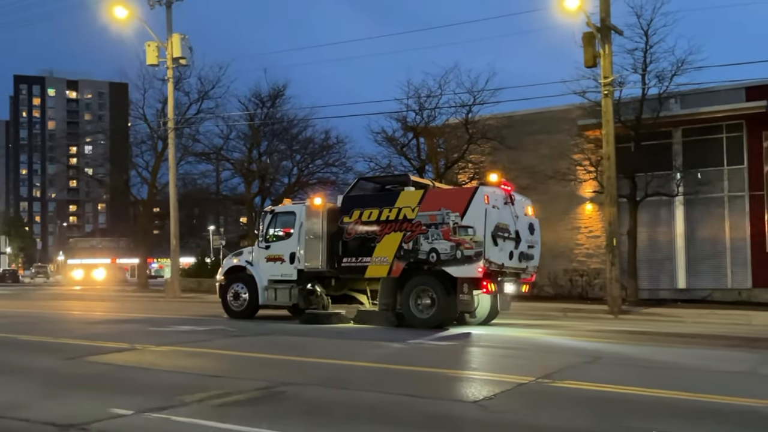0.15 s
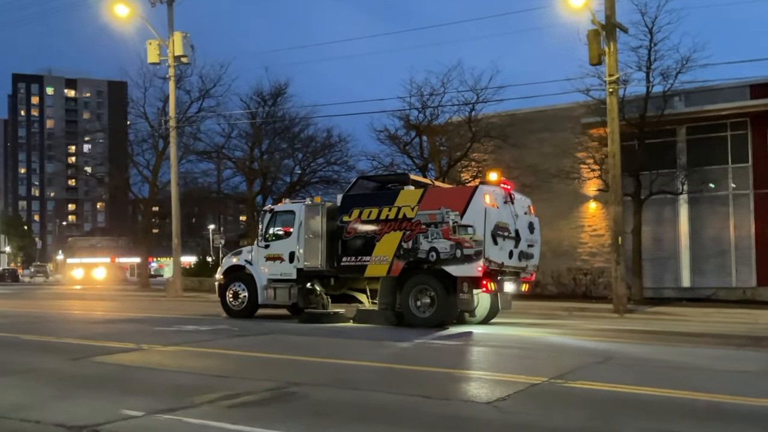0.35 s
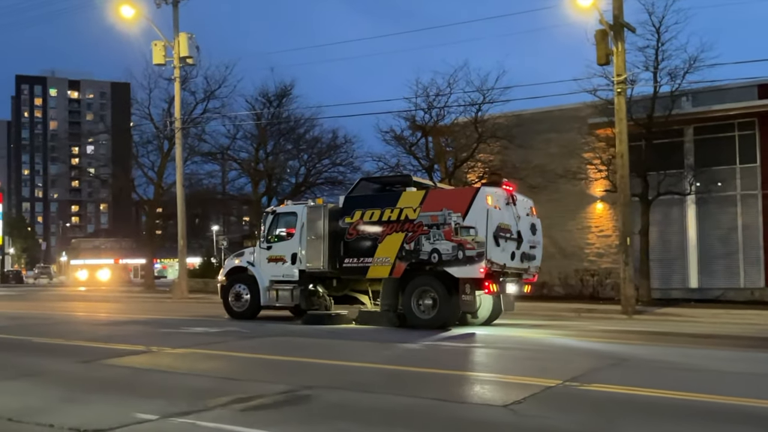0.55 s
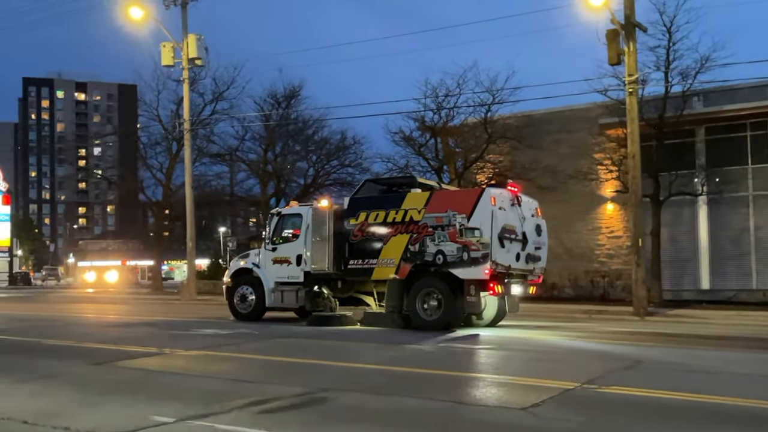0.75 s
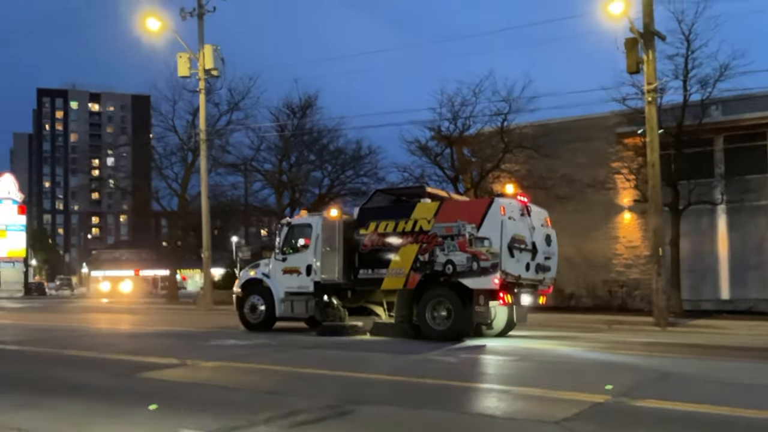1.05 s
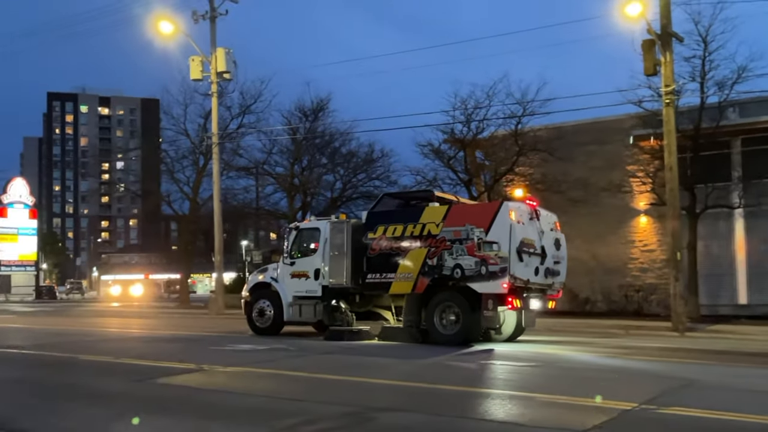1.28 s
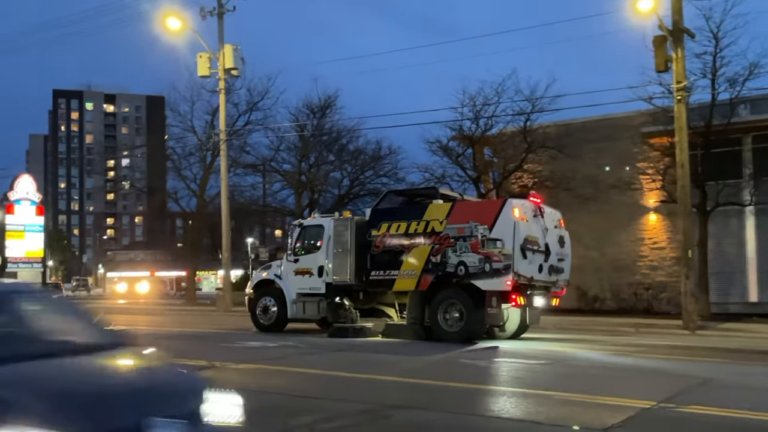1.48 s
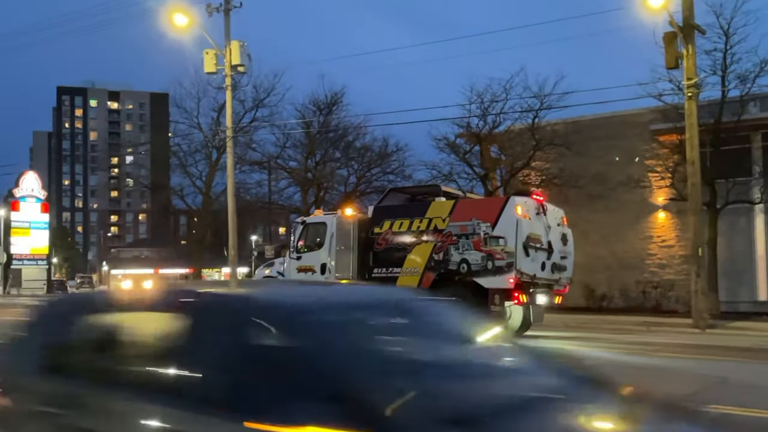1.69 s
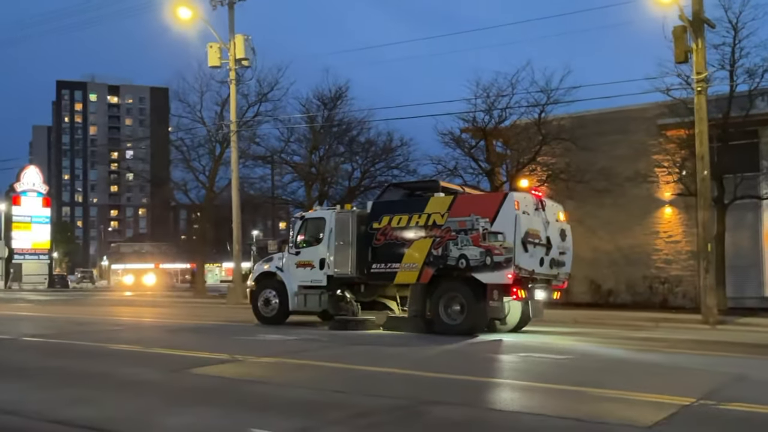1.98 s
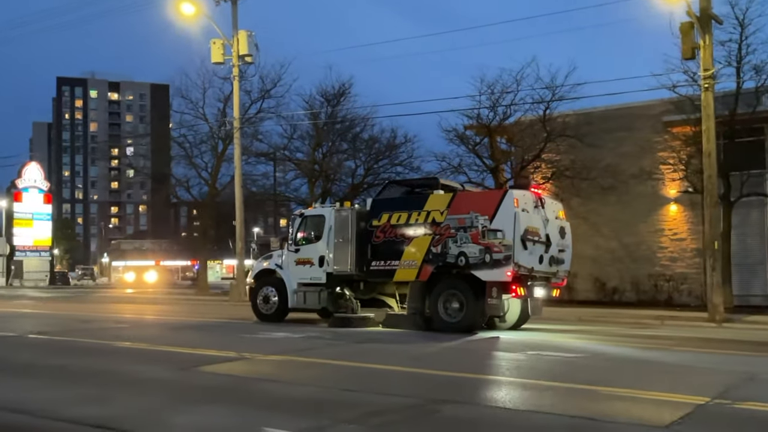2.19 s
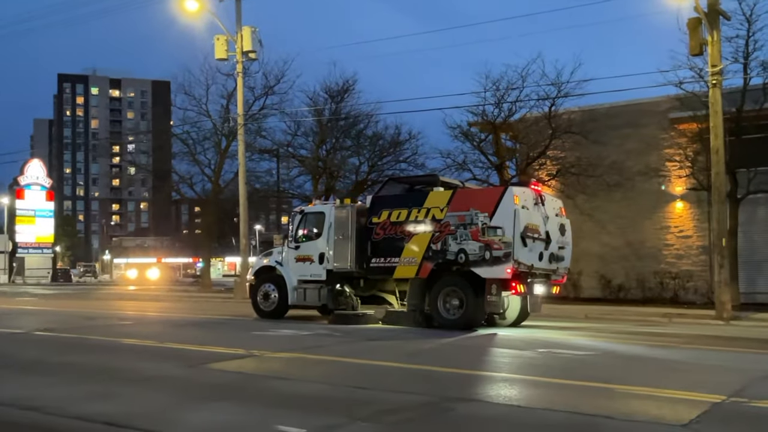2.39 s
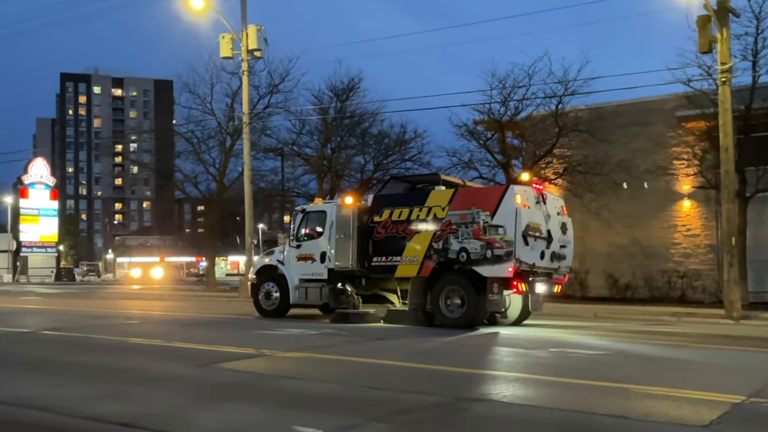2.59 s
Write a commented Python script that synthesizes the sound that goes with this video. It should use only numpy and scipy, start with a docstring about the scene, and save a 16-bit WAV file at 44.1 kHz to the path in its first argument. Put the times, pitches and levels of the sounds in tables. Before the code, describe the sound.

A street sweeper's roaring blower and hissing brooms across a city street, as a car whooshes past

```python
"""On a city street, a sweeper works along the far kerb: blower and engine roar, steel brooms hiss on asphalt.
Bristle flicks and shaped noise make the hiss; noise, resonances and a fan whine the blower; sines the engine.
A car passes close by from left to right as delayed tyre noise with an exhaust drone, slapping over two seams.
It briefly screens the brooms and blower, the finest hiss most.
Wind, as low noise in gusts, buffets the two microphone ports and drops about as the car comes abreast."""
import sys
import numpy as np
from scipy import signal
from scipy.fft import rfft, irfft
from scipy.io import wavfile
from scipy.ndimage import uniform_filter1d, map_coordinates

SR = 44100
rng = np.random.default_rng(int(sys.argv[2]) if len(sys.argv) > 2 else 0)


def transcribe(signal):
    """Save signal, clipped to [-1, 1], as a 16-bit WAV file at the path in sys.argv[1]."""
    frames = np.atleast_2d(signal).T
    limited = np.clip(frames, -1, 1)
    pcm = np.round(limited * 32767).astype(np.int16)
    wavfile.write(sys.argv[1], SR, pcm)


N = 120834
TIME = np.arange(N) / SR
HZ = np.maximum(np.arange(N // 2 + 1) * SR / N, 1)

# Swing of the brooms' hiss, before the low and high swing factors: time_s, swing_db
BROOM_SWING = [(0, 1.5), (.33, 3), (.64, 2.5), (.76, 1), (.98, 2), (1.22, 3), (1.38, 1), (1.6, 1.5),
               (1.92, -0.5), (2.15, -0.8), (2.27, 1.7), (2.35, -0.5), (2.42, 2), (2.54, -1.5), (2.62, 0.6),
               (2.74, 0.5)]
# Spectrum of bristles on asphalt: frequency_hz, relative_density_db (per Hz)
BROOM_SPECTRUM = [(1500, -2.5), (2800, 0.5), (4500, 2.5), (5300, -1), (5900, 1.5), (6250, -1.5), (7000, 0),
                  (10200, -2), (11800, -7.5), (13000, -12.5), (15500, -2)]
# Level of the blower's roar and whine over time: time_s, change_db
ROAR_SWING = [(0, 0.5), (.45, 1), (.6, 0.5), (1.0, 0), (1.35, 2), (1.6, 4), (2.0, -1), (2.4, -1.5),
              (2.74, -1)]
# Spectrum of the blower's rushing air: frequency_hz, relative_density_db (per Hz)
ROAR_SPECTRUM = [(30, -5), (60, -1), (180, 6), (300, 2.5), (580, 0), (800, -5), (1250, -3.5), (1600, -3.5),
                 (2000, -6), (2600, -16), (4500, -24), (9000, -43.5)]
# Duct and hopper resonances of the blower: frequency_hz, width_hz, level_db
DUCT_RESONANCES = [(476, 52, -50.5), (617, 180, -49), (950, 41, -46.5), (1694, 200, -41.5), (2137, 23, -51),
                   (4600, 570, -58)]
# Phase of the sweeper's direct sound between the ports: frequency_hz, left_lead_rad
PORT_LEAD = [(20, 0), (300, .3), (700, 1.1), (1000, 2.3), (1350, 2.3), (1850, 3.3), (2500, 6.5), (3100, 7),
             (4000, 6.5), (4800, 6.6), (5800, 9.4), (6100, 9.3), (6400, 5.6), (7200, 3.14), (8700, 3.14),
             (9300, 0), (12600, 0), (13150, -3.14)]
# Power of the sweeper's sound common to both ports: frequency_hz, common_share (0 to 1)
PORT_LIKENESS = [(60, .8), (400, .35), (900, .5), (1500, .7), (2700, .3), (4500, .7), (5900, .8),
                 (6400, .45), (7300, 1), (8300, 1), (9100, .5), (9700, 1)]
# Balance of the sweeper between the ports: frequency_hz, left_minus_right_db
PORT_BALANCE = [(100, 1.5), (450, 3.5), (1100, 4.5), (1800, -.5), (2900, 2), (4700, 1), (6500, 1),
                (7300, 0)]
# Spectrum of tyre and body noise: frequency_hz, relative_density_db (per Hz)
TYRE_SPECTRUM = [(40, -8), (120, -23), (270, 0.5), (420, -1.5), (650, 3), (800, 0), (1000, 5), (1200, 3.5),
                 (1450, -3), (2000, -8.5), (3000, -18), (6000, -50), (10000, -68), (15000, -64)]
# Axles crossing two road seams, levels before distance loss: peak_s, level_db
SEAM_CROSSINGS = [(1.467, -13.5), (1.633, -13), (2.008, -22), (2.175, -15)]
# Resonances of a struck tyre: frequency_hz, width_hz, relative_level_db
TYRE_RESONANCES = [(516, 90, -9), (700, 120, -6), (940, 70, 0.5), (1245, 110, -7)]
# Exhaust drone, levels before bearing and distance act: frequency_hz, width_hz, level_db
EXHAUST_RESONANCES = [(260.4, 24, -34.5), (504, 47, -36)]
# Level of the wind on the ports, before gusts: time_s, level_db
WIND_SWING = [(0, -22), (.13, -26.5), (.24, -27), (.29, -33), (.36, -24), (.56, -20.5), (.72, -22.5),
              (.84, -21), (.94, -23.5), (1.07, -21), (1.2, -22), (1.38, -22.5), (1.46, -23), (1.63, -20),
              (1.73, -32.5), (2.1, -36), (2.48, -32), (2.66, -27), (2.74, -27)]
# Spectrum of the wind's low rumble: frequency_hz, relative_density_db (per Hz)
WIND_SPECTRUM = [(20, -32), (36, -1), (52, 0.5), (80, 2), (130, -2.5), (200, -9), (300, -23.5), (600, -39),
                 (2000, -36.5), (10000, -87)]
# Spectrum of a gust's higher flutter: frequency_hz, relative_density_db (per Hz)
FLUTTER_SPECTRUM = [(60, -34), (140, 4.5), (240, 3.5), (430, -3.5), (650, -10.5), (1100, -18.5),
                    (2500, -45), (12000, -75)]
# Single gusts: centre_s, width_s, rumble_change_db, flutter_level_db, flutter_left_minus_right_db
GUST_EVENTS = [(0.01, 0.014, 6.5, -35, 7), (.066, 0.0059, 7, -37, 5), (.17, 0.011, 7.5, -31, 9),
               (.236, .007, 5, -33, 2), (.357, 0.0079, 9, -40, 3), (.428, 0.0082, 2.5, -29, 13),
               (.51, 0.009, 3, -32, 6), (.585, 0.046, -5, -26, 0), (.675, .01, 5, -29, 4),
               (.793, 0.0096, 10, -36, -2), (.875, 0.019, 9, -28, 0), (.94, 0.019, 4.5, -36, -2),
               (1.01, .012, -1.5, -33, -4), (1.12, 0.0051, 6, -32, 5), (1.21, 0.0097, 4, -31, 0),
               (1.304, 0.011, 11.5, -27, -7), (1.434, 0.006, 11, -24, 3), (1.47, 0.0072, 2.5, -16.5, 7),
               (1.539, .014, -1, -19, 7), (1.602, 0.0081, -0.5, -16, 8), (1.656, 0.011, 6, -27, 15),
               (1.75, 0.02, -9, -20.5, 1.5), (2.24, 0.021, 4.5, -27, 2.5), (2.38, 0.024, -2, -28.5, 2),
               (2.53, 0.035, -5, -25, 2.5), (2.724, 0.02, 6, -16.5, 4)]

# The finest hiss beams most, so it swings and is screened more than the rest
BROOM_SPLIT_HZ, LOW_HISS_SWING, HIGH_HISS_SWING = 6900, 0.48, 2.02
BROOM_DB, FLICKS_PER_S, FLICK_SPREAD_DB, FLICK_SHARE = -31.5, 9000, 2.5, 0.35
SCRAPE_FLUTTER_DB, SCRAPE_FLUTTER_PER_S = 0.56, 4.3  # depth before the swing factors
ROAR_DB = -26
# The fan's blade whine, blurred by turbulence; wander is a share of the pitch
WHINE_HZ, WHINE_DB, WHINE_WIDTH_HZ = 1584, -38, 13
WHINE_WANDER, WHINE_WANDERS_PER_S = .018, 4.97
FIRING_HZ, ENGINE_DB, ORDER_RISE_DB = 69.6, -49, 3.5
ENGINE_WANDER, ENGINE_WANDERS_PER_S = 0.021, 4.7
# Screening by the car; the brooms' depth is before the swing factors
SCREEN_FROM_S, SCREEN_TO_S, SCREEN_EDGE_S = 1.672, 1.862, .042
SCREEN_BROOM_DB, SCREEN_ROAR_DB = -5.5, -4
# Moving air makes each band of the distant sweeper waver on its own
WAVER_DB, WAVER_PER_S = 1.44, 21
# The car: moment abreast, speed, nearest distance, extra tyre noise fore and aft
CAR_S, CAR_M_PER_S, CAR_DISTANCE_M, TYRE_HORN_DB = 1.82, 15.7, 3.03, 3
CAR_DB, CAR_PAN_DB, CAR_LEFT_DB, CAR_LAG_S, CAR_LIKENESS = -23.5, 5.5, 2, 0.00038, 0.68
CAR_WAVER_DB, CAR_WAVER_PER_S = 2.0, 3
# Knocks and drone are muffled; the tyre roar is brightest abreast
BODY_MUFFLE_HZ, TYRE_BRIGHT_HZ, TYRE_DULL_DB = 1700, 1300, -2.5
SEAM_ATTACK_S, SEAM_DECAY_S, SEAM_PAN_DB = .008, 0.02, 5.5
EXHAUST_AFT_DB, EXHAUST_PAN_DB = 6, 3.5
SOUND_M_PER_S = 343
WIND_LIKENESS, WIND_LEFT_DB, WIND_LUMP_DB, WIND_LUMPS_PER_S = 0.44, 2, -0.9, 62
GUST_RISE, GUST_FALL = .7, 1.3  # shares of a gust's width
EVEN_S, FADE_S, BASS_CUT_HZ, CUTOFF_HZ = .025, .002, 43, 15600


def brooms(screened):
    """Impulsive friction: thousands of bristle flicks a second over a smooth scraping hiss."""
    flicks = (rng.random((3, N)) < FLICKS_PER_S / SR) * rng.choice([-1, 1], (3, N))
    strength_db = FLICK_SPREAD_DB * np.minimum(rng.exponential(1, (3, N)), 5)
    flicks = rms_one(flicks * from_db(strength_db))
    scrape = rng.standard_normal((3, N))
    hiss = from_db(BROOM_DB) * colour(blend(flicks, scrape, FLICK_SHARE), BROOM_SPECTRUM)
    low = lowpass(hiss, BROOM_SPLIT_HZ)
    high = hiss - low
    swing_db = in_time(BROOM_SWING) + SCREEN_BROOM_DB * screened
    swing_db = swing_db + SCRAPE_FLUTTER_DB * drift(SCRAPE_FLUTTER_PER_S)
    return low * from_db(LOW_HISS_SWING * swing_db) + high * from_db(HIGH_HISS_SWING * swing_db)


def blower():
    """Flow noise and resonance: rushing air, ringing ducts and the fan's wavering blade tone."""
    air = from_db(ROAR_DB) * colour(rng.standard_normal((3, N)), ROAR_SPECTRUM)
    air = air + resonances(DUCT_RESONANCES)
    turn = phase(WHINE_HZ, WHINE_WANDER, WHINE_WANDERS_PER_S)
    # slow random sine and cosine amplitudes broaden the tone
    whine = np.array([
        drift(WHINE_WIDTH_HZ) * np.cos(turn) + drift(WHINE_WIDTH_HZ) * np.sin(turn) for _ in air])
    return (air + from_db(WHINE_DB) * rms_one(whine)) * from_db(in_time(ROAR_SWING))


def engine(count=5):
    """Harmonic series of periodic firing: each order is stronger than the last, the pitch wanders."""
    turn = phase(FIRING_HZ, ENGINE_WANDER, ENGINE_WANDERS_PER_S)
    orders = 0
    for k in range(count):
        order = np.sin((k + 1) * turn + rng.uniform(0, 2 * np.pi))
        orders = orders + from_db(ORDER_RISE_DB * k) * order
    return from_db(ENGINE_DB) * rms_one(orders)


def across_street(x):
    """Partial coherence: row 0 arrives directly, rows 1 and 2 as scatter from road and walls."""
    z = rfft(x)
    direct = z[0] * np.exp(np.array([[.5j], [-.5j]]) * by_hz(PORT_LEAD))
    ports = blend(direct, z[1:], by_hz(PORT_LIKENESS))
    return irfft(ports * pan(by_hz(PORT_BALANCE)), N)


def car():
    """A moving source: distance loss, propagation delay (Doppler shift) and bearing follow its place."""
    along = CAR_M_PER_S * (TIME - CAR_S)
    distance = np.hypot(along, CAR_DISTANCE_M)
    bearing = along / distance  # -1 far left, 1 far right
    sent = TIME - distance / SOUND_M_PER_S

    def at_ports(sound, pan_db):
        """Interaural-style lag and level difference between the two ports."""
        direct = np.array([read_at(sound[0], sent + side * CAR_LAG_S * bearing) for side in (-.5, .5)])
        scatter = np.array([read_at(row, sent) for row in sound[1:]])
        return blend(direct, scatter, CAR_LIKENESS) * pan(CAR_LEFT_DB - pan_db * bearing)

    roll = at_ports(colour(rng.standard_normal((3, N)), TYRE_SPECTRUM), CAR_PAN_DB)
    roll = roll * from_db(CAR_DB + TYRE_HORN_DB * bearing ** 2)
    dull = lowpass(roll, TYRE_BRIGHT_HZ)
    roll = dull + (roll - dull) * from_db(TYRE_DULL_DB * bearing ** 2)

    ring = evened(lowpass(resonances(TYRE_RESONANCES), BODY_MUFFLE_HZ))
    slaps = at_ports(ring, SEAM_PAN_DB) * seam_blows()

    drone = lowpass(resonances(EXHAUST_RESONANCES), BODY_MUFFLE_HZ)
    # stronger astern, weaker ahead
    drone = at_ports(drone, EXHAUST_PAN_DB) * from_db(EXHAUST_AFT_DB * bearing)

    # the colour of the tyre roar shifts unevenly
    roll = wavering(roll, depth_db=CAR_WAVER_DB, rate=CAR_WAVER_PER_S, top_hz=3170, count=22)
    return (roll + slaps + drone) * CAR_DISTANCE_M / distance


def seam_blows():
    """Impact envelope: each axle slaps a seam with a quick rise, then exponential decay."""
    blows = 0
    for s, db in SEAM_CROSSINGS:
        rise_or_fall = np.minimum((TIME - s) / SEAM_ATTACK_S, (s - TIME) / SEAM_DECAY_S)
        blows = blows + from_db(db) * np.exp(rise_or_fall)
    return blows


def wind():
    """Turbulent pressure: lumpy low noise, partly separate at each port."""
    eddies = colour(rng.standard_normal((3, N)), WIND_SPECTRUM)
    lumps = rms_one(from_db(WIND_LUMP_DB * drift(WIND_LUMPS_PER_S)))
    level_db = in_time(WIND_SWING) + swells(GUST_EVENTS)
    buffets = evened(blend(eddies[0], eddies[1:], WIND_LIKENESS)) * lumps * from_db(level_db)
    return buffets * pan(WIND_LEFT_DB)


def flutter():
    """Local turbulence: short gusts tear across each port as independent noise."""
    strength = 0
    for s, width, _, db, left_db in GUST_EVENTS:
        strength = strength + from_db(db) * pan(left_db) * gust(s, width)
    return strength * evened(colour(rng.standard_normal((2, N)), FLUTTER_SPECTRUM))


def gust(s, width):
    """Asymmetric pulse: a bell that rises faster than it falls."""
    side_width = width * np.where(TIME < s, GUST_RISE, GUST_FALL)
    return np.exp(-.5 * ((TIME - s) / side_width) ** 2)


def swells(rows):
    """Superposition in decibels: the gusts' changes to the wind rumble."""
    return sum(db * gust(s, width) for s, width, db, *_ in rows)


def wavering(x, depth_db, rate, top_hz, count):
    """Random modulation: overlapping bands, each with a slow gain of its own."""
    z = rfft(x)
    centres = np.log(np.geomspace(300, top_hz, count))
    out = 0
    for band in np.eye(count):
        part = irfft(z * np.interp(np.log(HZ), centres, band), N)
        out = out + part * from_db(depth_db * drift(rate))
    return out


def resonances(rows):
    """Damped modes: three unrelated noises ring in the same two-pole resonances."""
    out = 0
    for hz, width, db in rows:
        r = np.exp(-np.pi * width / SR)
        poles = [1, -2 * r * np.cos(2 * np.pi * hz / SR), r * r]
        ring = signal.lfilter([1, 0, -1], poles, rng.standard_normal((3, N)))
        out = out + from_db(db) * rms_one(ring)
    return out


def phase(hz, wander, rate):
    """Phase in radians as the running sum of a randomly wandering frequency."""
    return 2 * np.pi * np.cumsum(hz * (1 + wander * drift(rate))) / SR


def drift(rate):
    """Low-passed chance: slow random motion with spread 1."""
    return rms_one(irfft(rfft(rng.standard_normal(N)) / (1 + (HZ / rate) ** 2), N))


def colour(x, spectrum):
    """Spectral shaping of white noise, scaled to rms 1."""
    return rms_one(irfft(rfft(x) * from_db(by_hz(spectrum)), N))


def lowpass(x, cut_hz):
    """Attenuation that rolls off steeply above a frequency."""
    return irfft(rfft(x) / (1 + (HZ / cut_hz) ** 4), N)


def evened(x):
    """Short-time normalization to rms near 1, so that gusts and blows set the shape."""
    power = uniform_filter1d(x ** 2, int(EVEN_S * SR), axis=-1)
    return x / np.sqrt(np.maximum(power, 1e-12))


def blend(common, own, likeness):
    """Power-preserving sum of a shared signal and independent ones."""
    share = np.clip(likeness, 0, 1)
    return np.sqrt(share) * common + np.sqrt(1 - share) * own


def pan(left_db):
    """Level difference split evenly into left and right gains."""
    return from_db(np.array([[.5], [-.5]]) * left_db)


def read_at(x, seconds):
    """Variable delay: interpolate a sound at moving read times."""
    return map_coordinates(x, [seconds * SR], order=3, mode="mirror")


def in_time(rows):
    """Linear interpolation of a curve at every sample."""
    return np.interp(TIME, *np.transpose(rows))


def by_hz(rows):
    """Interpolation of a table along logarithmic frequency."""
    hz, value = np.transpose(rows)
    return np.interp(np.log(HZ), np.log(hz), value)


def from_db(db):
    """Decibels to amplitude ratio."""
    return 10 ** (np.asarray(db) / 20)


def rms_one(x):
    """Normalization to unit rms."""
    return x / np.sqrt(np.mean(x ** 2) + 1e-20)


def scene():
    """Superposition: the sweeper behind the passing car, with wind on top."""
    enter = np.tanh((TIME - SCREEN_FROM_S) / SCREEN_EDGE_S)
    leave = np.tanh((TIME - SCREEN_TO_S) / SCREEN_EDGE_S)
    screened = .5 * (enter - leave)
    sweeper = across_street(brooms(screened) + blower() * from_db(SCREEN_ROAR_DB * screened))
    sweeper = wavering(sweeper, depth_db=WAVER_DB, rate=WAVER_PER_S, top_hz=14000, count=18)
    return sweeper + engine() + car() + wind() + flutter()


def record(dry):
    """Band limiting: the microphones shed the deepest bass, and a steep filter cuts the top."""
    bass_cut = signal.butter(4, BASS_CUT_HZ, "high", fs=SR, output="sos")
    top_cut = signal.ellip(12, .1, 80, CUTOFF_HZ, fs=SR, output="sos")
    fade = np.minimum(np.minimum(TIME, TIME[::-1]) / FADE_S, 1)
    return signal.sosfilt(top_cut, signal.sosfilt(bass_cut, dry * fade))


dry = scene()
out = record(dry)
transcribe(out)
```